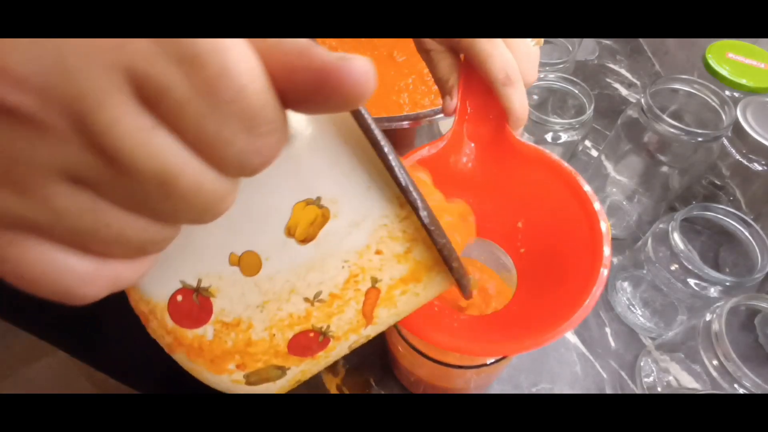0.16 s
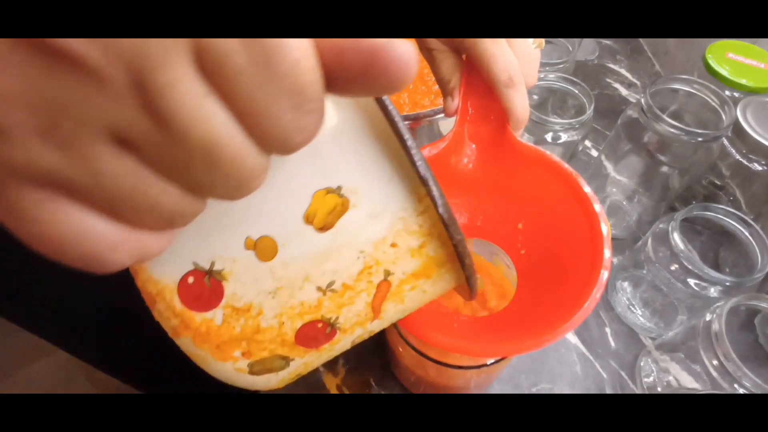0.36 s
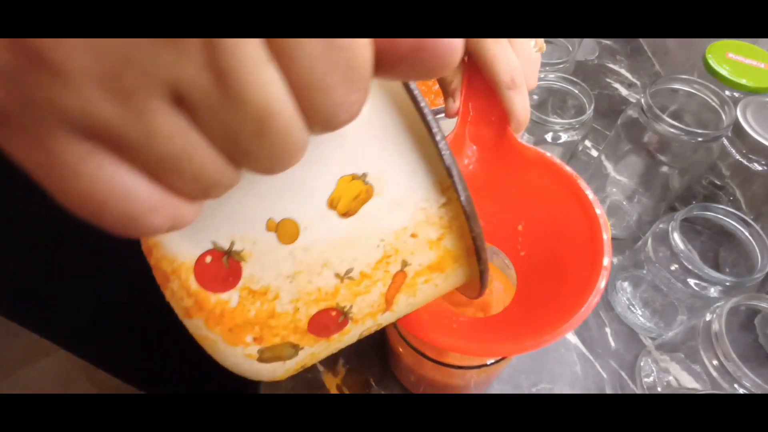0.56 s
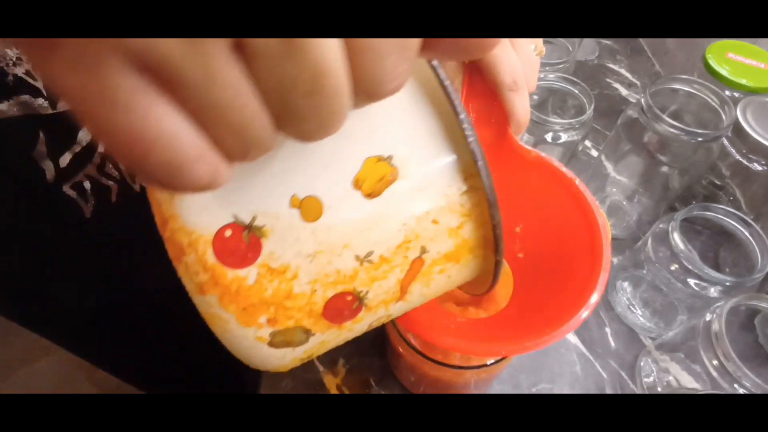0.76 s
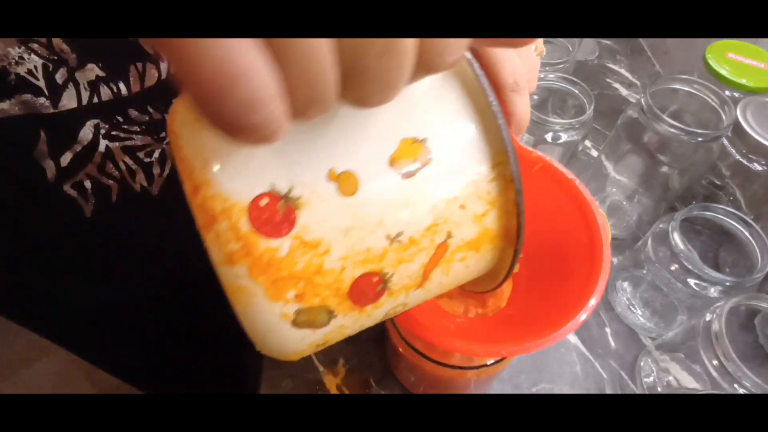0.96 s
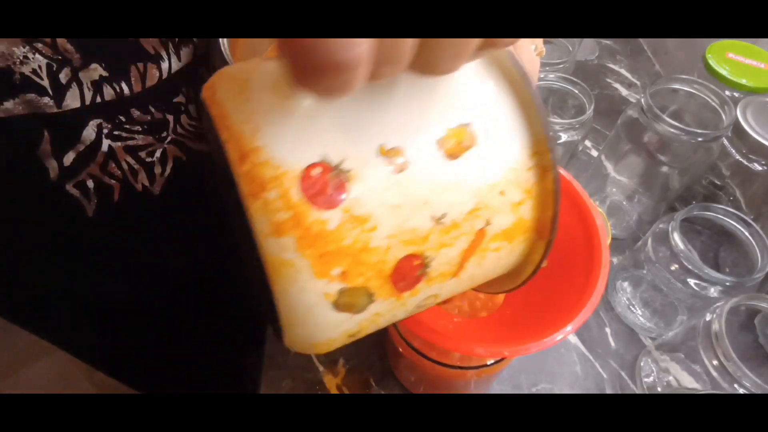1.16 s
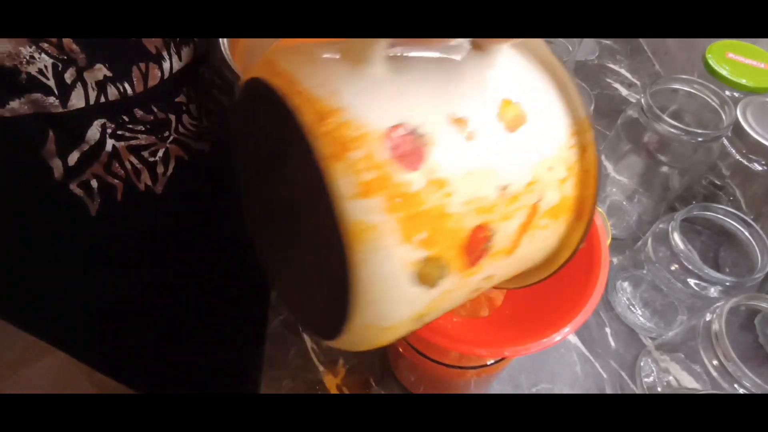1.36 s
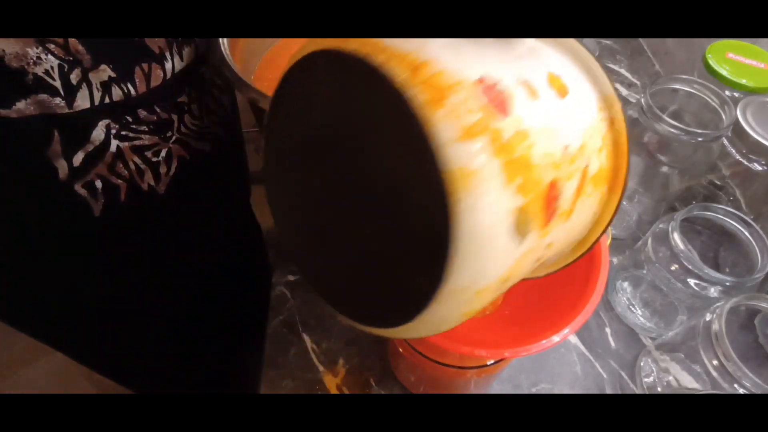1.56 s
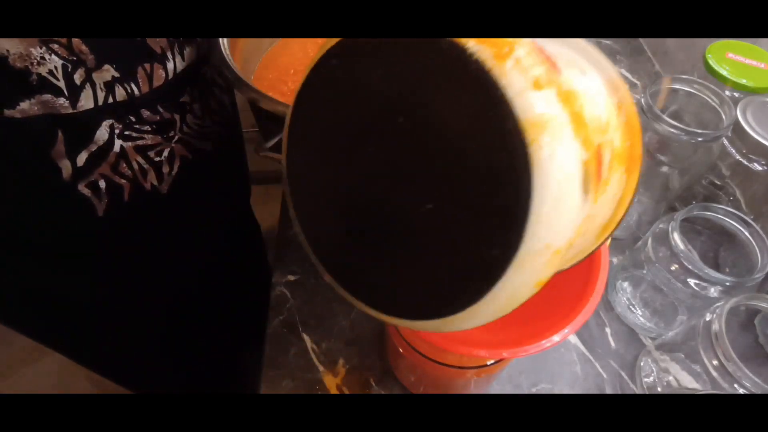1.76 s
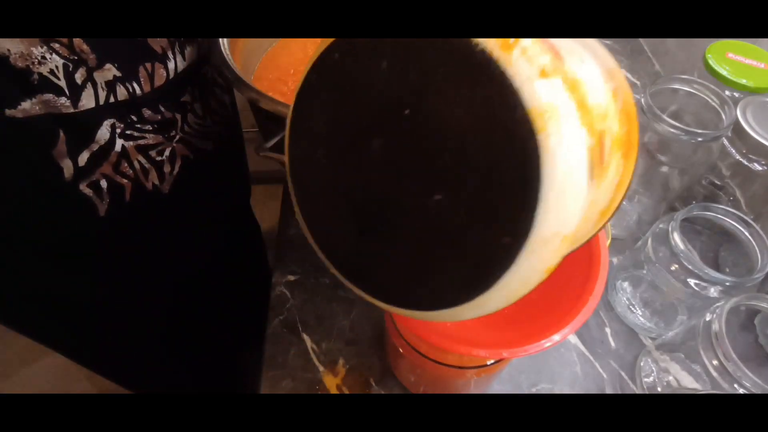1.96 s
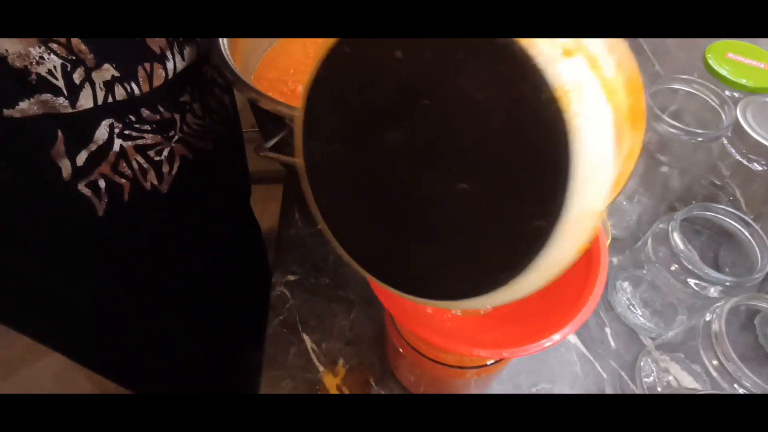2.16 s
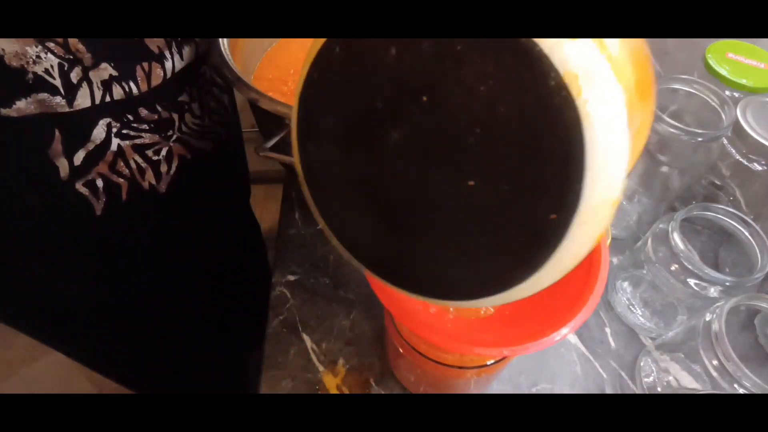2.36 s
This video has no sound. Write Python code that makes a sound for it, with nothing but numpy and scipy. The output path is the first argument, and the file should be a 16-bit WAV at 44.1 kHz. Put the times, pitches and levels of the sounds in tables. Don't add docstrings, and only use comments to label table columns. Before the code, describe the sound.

After a brief quiet, wet pulp slaps and squelches down a funnel, the mug rim knocking and rubbing it, the jar bumping the table; the flow thins to a few drips, heard close in a lightly reverberant kitchen.

```python
import sys
import numpy as np
from scipy import signal
from scipy.fft import rfft, irfft, next_fast_len
from scipy.io import wavfile
from scipy.ndimage import map_coordinates

SR = 44100
rng = np.random.default_rng(int(sys.argv[2]) if len(sys.argv) > 2 else 0)


def file_out(sig):
    cols = np.atleast_2d(sig).T
    lim = np.clip(cols, -1, 1)
    pcm = np.round(lim * 32767).astype(np.int16)
    wavfile.write(sys.argv[1], SR, pcm)


def attenuation_scalar(level_db):
    decades = np.asarray(level_db, float) / 20
    return 10 ** decades


N = 110250

# [f/Hz, level/dB]
AIR_SPECTRUM = [(30, -28), (105, 0.5), (190, -17.5), (500, -9.5), (900, -19.5), (1220, -11.5),
                (3200, -31.5), (16000, -42.5)]
# [t/s, length/s, flow level/dB, mug-on-funnel level/dB]
PULP_SLIDES = [(0, 0.059, -91, -60.5), (0.111, 0.14, -57, -52), (0.225, 0.16, -40.5, -41.5),
               (0.372, 0.12, -41, -41.5), (0.459, 0.14, -41.5, -41), (0.576, 0.11, -47.5, -37.5),
               (0.71, 0.14, -45.5, -36), (0.818, 0.18, -45.5, -37), (0.981, 0.12, -47, -37),
               (1.132, 0.14, -45.5, -40), (1.275, 0.14, -48.5, -45.5), (1.409, 0.11, -48, -47),
               (1.515, 0.12, -45, -42.5), (1.638, 0.19, -59.5, -50), (1.823, 0.14, -72, -56),
               (1.93, 0.16, -78, -52)]
# [f/Hz, level/dB]
WET_SPECTRUM = [(410, -40.5), (700, -6), (946, -23.5), (1180, -11.5), (2960, -10.5), (8310, -11.5),
                (12200, -5.5), (16000, -15.5)]
# [f/Hz, level/dB, t60/s]
JAR_MODES = [(231.6, -11, 0.15), (310.7, -3, 0.16), (350.5, -6, 0.13), (523, -4, 0.086),
             (604.3, -14.5, 0.18), (675, -21, 0.17), (794, -26.5, 0.13)]
# [f/Hz, level/dB, t60/s]
TABLE_MODES = [(83.4, -8, 0.41), (110, -5.5, 0.39), (132.7, -6, 0.3)]
# [f/Hz, width/Hz, level/dB]
NECK_MODES = [(965, 160, -7.5), (1420, 190, 0), (2200, 300, -7)]
# [t/s, peak level/dB, brightest f/Hz]
DROP_EVENTS = [(0.0766, -42, 3100), (0.2722, -23.5, 4500), (.274, -26, 2900), (.296, -22, 2000),
               (0.294, -20, 13000), (0.318, -21.5, 4140), (0.3285, -24.5, 3340), (.366, -24.5, 2900),
               (0.4116, -16, 3200), (0.418, -20, 4440), (.431, -15.5, 3060), (0.435, -18.5, 4980),
               (0.452, -23, 4200), (.489, -23, 3970), (0.504, -30, 3140), (0.5161, -19.5, 3540),
               (0.637, -25, 5500), (.678, -22.5, 2140), (.7596, -30, 4500), (0.889, -22, 4300),
               (0.9001, -19.5, 5430), (1.033, -30.5, 7000), (1.0754, -23, 4740), (1.0914, -29, 2480),
               (1.153, -30, 6060), (1.1867, -22.5, 6340), (1.205, -25, 4600), (1.217, -30, 6580),
               (1.33, -34, 5000), (1.365, -22.5, 5000), (1.376, -31.5, 4370), (1.4081, -34, 10900),
               (1.4508, -23, 6300), (1.6388, -25.5, 3850), (1.7149, -32, 9100), (1.7263, -26, 5160),
               (1.7798, -27, 3540), (1.8252, -40.5, 5000), (1.9, -49, 7450), (2.047, -50, 5330),
               (2.074, -55, 5940), (2.14, -51.5, 8000), (2.3933, -47, 5900), (2.4675, -42.5, 2930)]
# [t/s, peak level/dB, brightest f/Hz, t60/s]
SLAP_EVENTS = [(0.1303, -20, 2750, 0.044), (0.2142, -6.5, 4100, 0.039), (0.2788, -13, 5330, 0.039),
               (0.3971, -15.5, 3050, 0.047), (0.4441, -16, 12950, 0.057), (0.499, -18, 3170, 0.043),
               (0.5318, -20, 11770, 0.039), (0.592, -17.5, 9540, 0.038), (0.617, -20, 4300, 0.082),
               (0.6988, -18.5, 4440, 0.034), (0.733, -16, 5000, 0.048), (0.7806, -24, 12200, 0.076),
               (0.845, -15.5, 6400, 0.03), (0.8785, -17, 2330, 0.1), (0.9511, -17, 4660, 0.043),
               (0.9972, -20.5, 3930, 0.068), (1.0616, -25, 6400, 0.035), (1.1066, -23.5, 6250, 0.037),
               (1.163, -20, 4900, 0.035), (1.2551, -24.5, 6400, 0.04), (1.29, -26, 7200, 0.055),
               (1.3527, -23, 6200, 0.045), (1.4341, -20.5, 4970, 0.093), (1.518, -33, 5870, 0.11),
               (1.5336, -8.5, 4710, 0.043), (1.5855, -18.5, 6440, 0.042), (1.662, -21, 4950, 0.045),
               (1.6774, -17.5, 9100, 0.059), (1.762, -26.5, 4780, 0.044), (1.9434, -40.5, 4600, 0.056)]
# [t/s, peak level/dB, f/Hz]
PLOP_EVENTS = [(0.1281, -35, 1426), (0.2101, -16, 2510), (0.4325, -27, 1310), (.5316, -23, 2100),
               (.589, -32, 2100), (0.6958, -22.5, 1930), (0.7322, -20.5, 2175), (.7596, -28, 1240),
               (.7821, -30, 1290), (0.8435, -20.5, 1437), (.888, -27.5, 1340), (0.9495, -19.5, 1420),
               (.9497, -24, 2200), (1.012, -31, 1420), (1.063, -22.5, 1374), (1.091, -31, 1420),
               (1.106, -27, 1420), (1.163, -36, 1360), (1.187, -41, 1360), (1.204, -40, 1440),
               (1.217, -32.5, 1410), (1.255, -28.5, 1400), (1.291, -26.5, 1447), (1.329, -46, 1290),
               (1.349, -31.5, 1400), (1.4496, -30, 1420), (1.452, -39, 2250), (1.5339, -30, 1460),
               (1.535, -31, 2310), (1.589, -37, 1680), (1.6777, -28, 1504)]
# [t/s, peak level/dB, f/Hz]
GULP_EVENTS = [(0.175, -32.5, 1236), (.274, -30, 1220), (0.516, -23, 1860), (.846, -18.5, 690),
               (.592, -30.5, 1006), (1.255, -24, 821), (1.291, -28, 772), (1.35, -35, 814),
               (1.445, -49, 950), (1.535, -36, 870), (1.662, -45.5, 936), (1.679, -41, 963),
               (1.758, -43, 942), (1.943, -40, 955), (1.944, -41, 2120), (2.145, -55.5, 600)]
# [t/s, peak level/dB, funnel f/Hz]
KNOCK_EVENTS = [(0.131, -39.5, 447), (.175, -37, 470), (0.211, -24, 553), (0.251, -30.5, 505),
                (0.302, -26, 437), (0.393, -29, 516), (0.436, -21.5, 470), (0.516, -24.5, 588),
                (0.531, -17, 486), (0.592, -8, 535), (0.733, -12, 538), (0.78, -18, 473), (0.844, -7, 573),
                (0.879, -12.5, 615), (0.947, -21, 584), (0.99, -23, 584), (1.063, -20, 628),
                (1.254, -13, 580), (1.292, -21.5, 510), (1.534, -29.5, 564), (1.682, -38.5, 593),
                (1.944, -37, 584)]
# [t/s, peak level/dB, boom f/Hz]
THUMP_EVENTS = [(0.217, -35, 119.4), (0.253, -29, 111.5), (0.432, -30, 105), (0.53, -25.5, 114),
                (0.594, -20.5, 123), (.64, -24, 107), (0.736, -24.5, 119.6), (0.848, -6.5, 115.4),
                (0.919, -13, 115), (1.064, -27.5, 110), (1.14, -32.5, 102.2), (1.255, -34.5, 135.3),
                (1.457, -46.5, 131), (1.535, -41.5, 124.5), (1.959, -58.5, 107)]
# [f/Hz, width/Hz, gain added]
MUG_CAVITY = [(1150, 300, -.7), (1430, 250, 1.3), (3150, 1500, -.85)]
# [f/Hz, t60/s]
ROOM_DECAY = [(100, 0.33), (300, 0.71), (12000, 0.22)]
# [t/s, level/dB]
MUG_PAN = [(0.0, -2.5), (.8, -4), (.95, -6), (1.3, -5.5), (1.72, -7.5), (1.9, -7), (2.5, -5.5)]

WIDE_DB = -1
AIR_DB, HISS_DB, HISS_S, HISS_HZ = -64.5, -74.5, 2.23, 5000
EDGE_S, DRAIN_T60_S = 0.035, 0.18
SAG = 0.58
GRAINS_PER_S, GRAIN_SPREAD_DB, GRAIN_CYCLES, GRAIN_DB, CLUMP_DB = 1600, 2.5, 4, 3, 3.5
RUB_LUMP_DB, RUB_TABLE_DB, NECK_DB = 5, -7, -13.5
CRACK_DB, PEAK_DB, PEAK_WIDTH = -5.5, -3.5, 0.16
SLAP_SWELL_S, GRIT_DB, SNAP_DB, SNAP_T60_S = 0.0025, 2.5, 5.5, 0.0055
DROP_T60_S, DROP_CRACK_DB = 0.044, -10.5
PLOP_T60_S, PLOP_DB, PLOP_WIDTH = 0.025, 3.5, 0.16
FUNNEL_T60_S, SWELL_S, JAR_DB = 0.05, 0.0012, -7
TABLE_DB, TABLE_SWELL_S, BOOM_T60_S, SIDE_MODES_DB = -1.5, 0.009, 0.31, -6.5
BOOM_SAG = 0.5
TIP_S, TIP_LENGTH_S = 0.84, 0.4
LAST_S, LAST_DB, LAST_HZ, LAST_WIDTH_HZ, LAST_T60_S = 1.943, -49, 1800, 3500, 0.5
ROOM_DB, ROOM_LOW_HZ = -12, 110
LOW_PAN_DB, TOP_HZ = 3.5, 15900


def unit(x):
    return x / np.sqrt(np.mean(x ** 2) + 1e-20)


def along(points, hz):
    f, v = np.transpose(points)
    return np.interp(np.log(hz + 1), np.log(f + 1), v)


def curves(rows):
    s, *cols = np.transpose(rows)
    return [np.interp(np.arange(N) / SR, s, c) for c in cols]


def wobble(rate):
    knots = rng.standard_normal(int(N * rate / SR) + 4)
    return map_coordinates(knots, [np.arange(N) * rate / SR])


def filtered(x, response):
    m = next_fast_len(x.shape[-1] + 4096)
    spectrum = rfft(x, m) * response(np.fft.rfftfreq(m, 1 / SR))
    return irfft(spectrum, m)[..., :x.shape[-1]]


def resonance(hz, centre_hz, width_hz):
    damping = 1j * hz * width_hz
    return damping / (centre_hz ** 2 - hz ** 2 + damping)


def fade(t, t60, swell):
    return attenuation_scalar(-60 * t / max(t60, 0.004)) * (1 - np.exp(-t / swell))


def ring(modes, t, swell, spread_db):
    total = 0
    for hz, db, t60 in modes:
        gain = attenuation_scalar(db + spread_db * rng.standard_normal())
        total = total + gain * fade(t, t60, swell) * np.sin(2 * np.pi * hz * t)
    return total


def add(track, s, x):
    spot = track[..., round(s * SR):][..., :x.shape[-1]]
    spot += x[..., :spot.shape[-1]]


def wide(length):
    a, b = rng.standard_normal((2, length))
    return np.array([a + attenuation_scalar(WIDE_DB) * b, a - attenuation_scalar(WIDE_DB) * b])


def air():
    floor = unit(filtered(wide(N), lambda f: attenuation_scalar(along(AIR_SPECTRUM, f))))
    hiss = unit(filtered(wide(N), lambda f: resonance(f, HISS_HZ, 1800) ** 2))
    rise = np.clip((np.arange(N) / SR - HISS_S) / 0.16, 0, 1)
    return attenuation_scalar(AIR_DB + 0.8 * wobble(5.1)) * floor + attenuation_scalar(HISS_DB) * rise * hiss


def slides(level_column):
    t, rows = np.arange(N) / SR, np.array(PULP_SLIDES)
    s, end = rows[:, :1], rows[:, :1] + rows[:, 1:2]
    swell = np.clip((t - s) / EDGE_S, 0, 1)
    flow = np.clip((end - t) / EDGE_S, 0, 1) * (1 - SAG * (t - s) / (end - s))
    drain = 0.1 * attenuation_scalar(-60 * np.maximum(t - end, 0) / DRAIN_T60_S)
    level = attenuation_scalar(rows[:, level_column:level_column + 1])
    return np.sqrt(np.sum((level * swell * (flow + drain)) ** 2, 0))


def pulp():
    u = rng.random((int(GRAINS_PER_S * N / SR), 4))
    t = np.arange(128) / SR
    hz = 1700 * 9 ** u[:, 1:2]
    size = attenuation_scalar(-GRAIN_SPREAD_DB * np.log(u[:, 2:3] + 0.01))
    grains = size * np.sin(2 * np.pi * hz * t) * np.exp(-t * hz / GRAIN_CYCLES)
    at = (u[:, :1] * N).astype(int) + np.arange(len(t))
    sides = []
    for gain in (1.3 - 0.6 * u[:, 3:], 0.7 + 0.6 * u[:, 3:]):
        sides.append(np.bincount(at.ravel(), (grains * gain).ravel(), N + len(t))[:N])
    hiss = unit(filtered(wide(N), lambda f: attenuation_scalar(along(WET_SPECTRUM, f))))
    wet = attenuation_scalar(GRAIN_DB) * unit(np.array(sides)) + hiss
    clumps = attenuation_scalar(CLUMP_DB * wobble(44.43) + 0.73 * wobble(150))
    return slides(level_column=2) * unit(wet * clumps)


def rub():
    def driven(bands):
        lumps = rng.standard_normal(N) * attenuation_scalar(RUB_LUMP_DB * np.tanh(wobble(40.08)))
        return unit(filtered(lumps, lambda f: sum(attenuation_scalar(db) * resonance(f, hz, w) for hz, w, db in bands)))

    def body(modes):
        return driven([(hz, 3.54 / t60, db) for hz, db, t60 in modes])

    mix = body(JAR_MODES) + attenuation_scalar(RUB_TABLE_DB) * body(TABLE_MODES) + attenuation_scalar(NECK_DB) * driven(NECK_MODES)
    return slides(level_column=3) * mix


def slaps():
    out, t = np.zeros((2, N)), np.arange(SR // 5) / SR
    rows = [(*row, CRACK_DB) for row in SLAP_EVENTS]
    rows += [(*row, DROP_T60_S, DROP_CRACK_DB) for row in DROP_EVENTS]
    for s, db, hz, t60, crack_db in rows:
        def colour(f):
            return attenuation_scalar(crack_db + along(WET_SPECTRUM, f)) + attenuation_scalar(PEAK_DB) * resonance(f, hz, PEAK_WIDTH * hz)

        grit = attenuation_scalar(GRIT_DB * np.repeat(rng.standard_normal(len(t) // 30), 30))
        crack = grit * fade(t, t60, SLAP_SWELL_S * t60 / 0.05)
        snap = attenuation_scalar(SNAP_DB) * (0.05 / t60) ** 2 * fade(t, SNAP_T60_S, 0.0003)
        add(out, s, attenuation_scalar(db) * filtered(wide(len(t)) * (crack + snap), colour))
    return out


def plops():
    out, t = np.zeros((2, N)), np.arange(SR // 8) / SR
    for s, db, hz in list(PLOP_EVENTS) + list(GULP_EVENTS):
        rough = unit(filtered(wide(len(t)), lambda f: resonance(f, hz, PLOP_WIDTH * hz)))
        tone = np.sin(2 * np.pi * hz * t)
        envelope = fade(t, PLOP_T60_S * 1400 / hz, 0.0022)
        add(out, s, attenuation_scalar(db + PLOP_DB) * envelope * (tone + 0.58 * rough))
    return out


def knocks():
    out, t = np.zeros(N), np.arange(SR * 3 // 4) / SR
    for s, db, hz in KNOCK_EVENTS:
        funnel = fade(t, FUNNEL_T60_S, SWELL_S) * np.sin(2 * np.pi * hz * t)
        jar = ring(JAR_MODES, t, SWELL_S * 3, spread_db=3.5)
        add(out, s, attenuation_scalar(db) * (funnel + attenuation_scalar(JAR_DB) * jar))
    for s, db, hz in THUMP_EVENTS:
        phase = 2 * np.pi * hz * t * (1 - BOOM_SAG * t / 2)
        boom = fade(t, BOOM_T60_S, TABLE_SWELL_S) * np.sin(phase)
        side_modes = ring(TABLE_MODES[::2], t, TABLE_SWELL_S, spread_db=2)
        add(out, s, attenuation_scalar(db + TABLE_DB) * (boom + attenuation_scalar(SIDE_MODES_DB) * side_modes))
    return out


def tipped(x):
    share = np.clip((np.arange(N) / SR - TIP_S) / TIP_LENGTH_S, 0, 1)
    return x + share * filtered(x, lambda f: sum(g * resonance(f, hz, w) for hz, w, g in MUG_CAVITY))


def dregs():
    out, t = np.zeros((2, N)), np.arange(SR // 2) / SR
    noise = unit(filtered(wide(len(t)), lambda f: resonance(f, LAST_HZ, LAST_WIDTH_HZ) ** 2))
    wet = noise * attenuation_scalar(2.5 * wobble(68.5)[:len(t)])
    add(out, LAST_S, attenuation_scalar(LAST_DB) * fade(t, LAST_T60_S, 0.00066) * wet)
    return out


def room(x):
    hz, t, z = signal.stft(rng.standard_normal((2, SR // 2)), SR, nperseg=256)
    decay = attenuation_scalar(-60 * t / along(ROOM_DECAY, hz)[:, None])
    tail = signal.istft(z * decay, SR, nperseg=256)[1]
    delayed = np.pad(x, (200, 0))[None]
    return signal.fftconvolve(delayed, tail / np.linalg.norm(tail[0]), axes=1)[:, :N]


def scene():
    side = np.array([[0.5], [-0.5]])
    bright = tipped(slaps() + pulp()) + plops() + dregs()
    low = knocks() + rub()
    near = low * attenuation_scalar(-LOW_PAN_DB * side) + bright * attenuation_scalar(curves(MUG_PAN)[0] * side)
    far = filtered(near.mean(0), lambda f: f / np.hypot(f, ROOM_LOW_HZ))
    return near + attenuation_scalar(ROOM_DB) * room(far) + air()


def low_pass(x):
    return signal.sosfilt(signal.butter(12, 16980, fs=SR, output="sos"), x)


def record(dry):
    mix = filtered(dry, lambda f: 1 / (1 + (f / TOP_HZ) ** 60))
    return low_pass(mix)


dry = scene()
out = record(dry)
file_out(out)
```